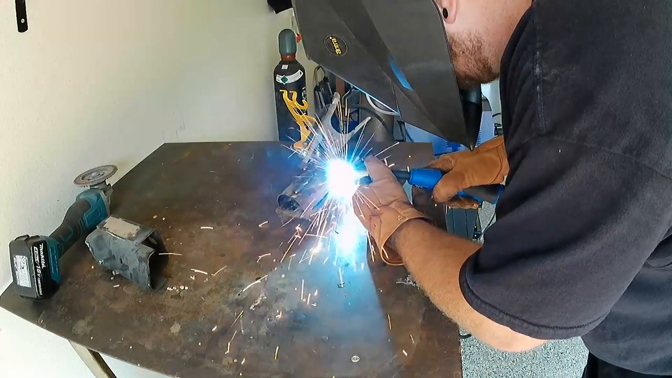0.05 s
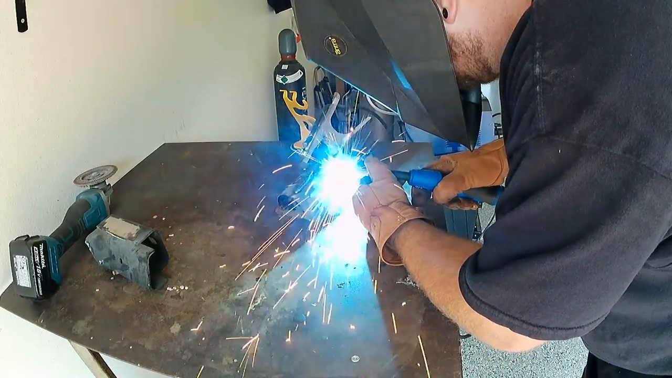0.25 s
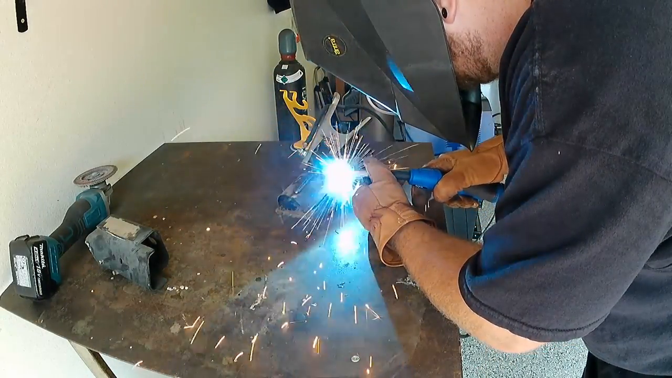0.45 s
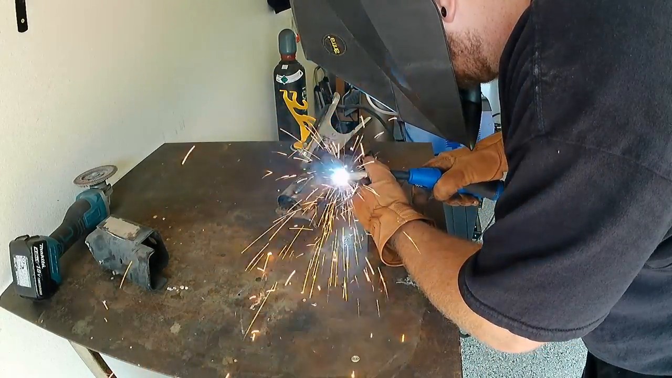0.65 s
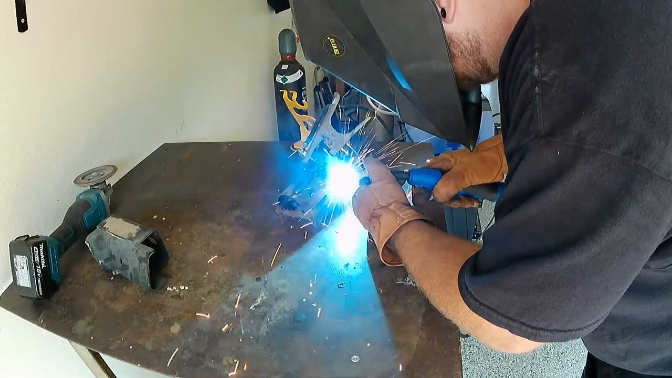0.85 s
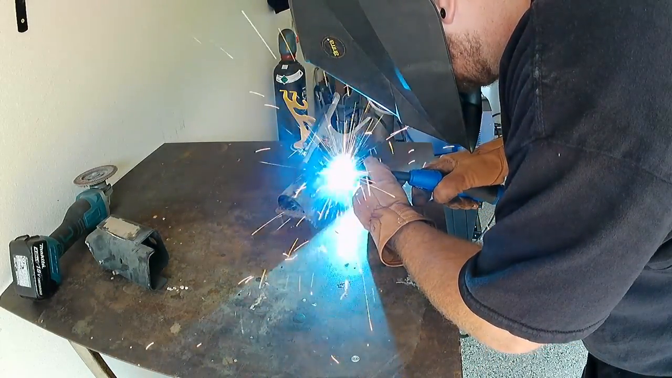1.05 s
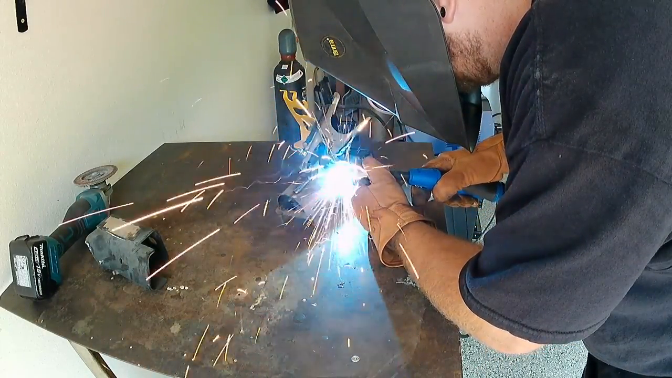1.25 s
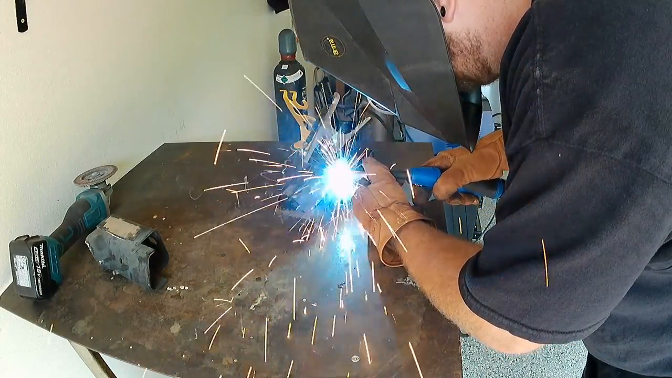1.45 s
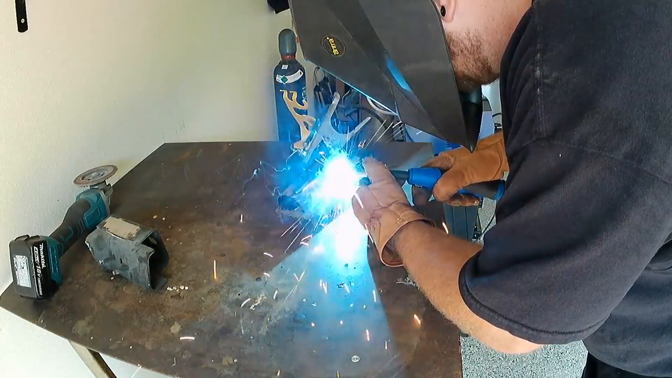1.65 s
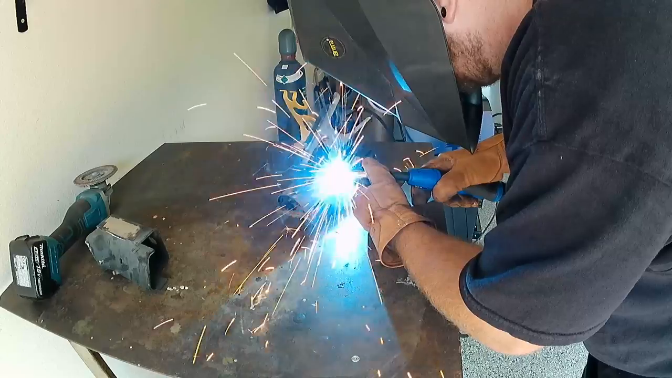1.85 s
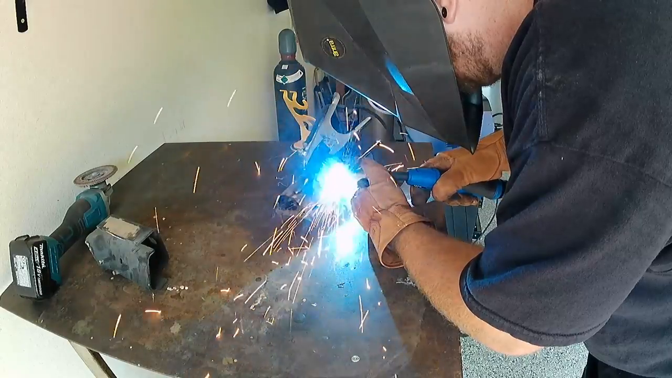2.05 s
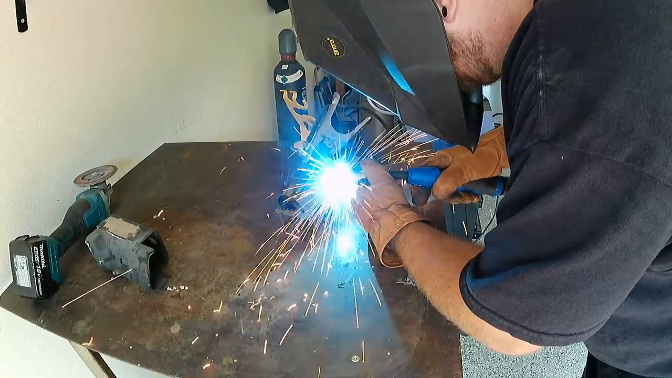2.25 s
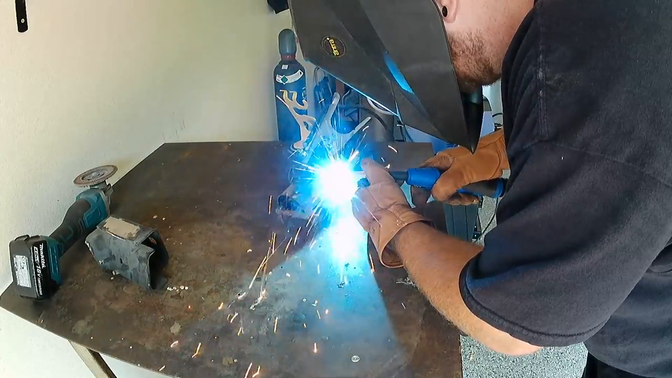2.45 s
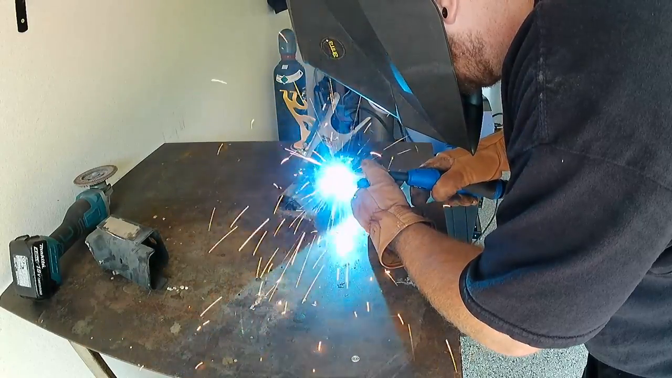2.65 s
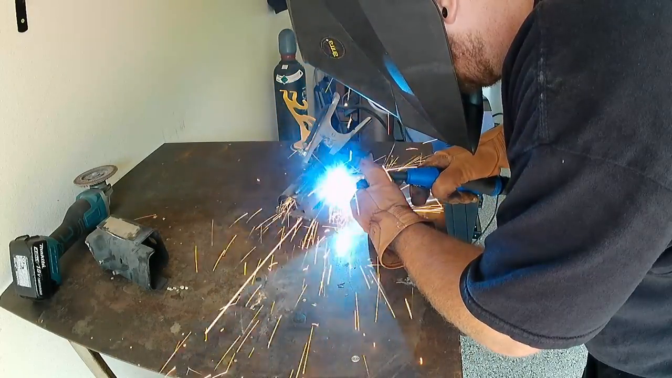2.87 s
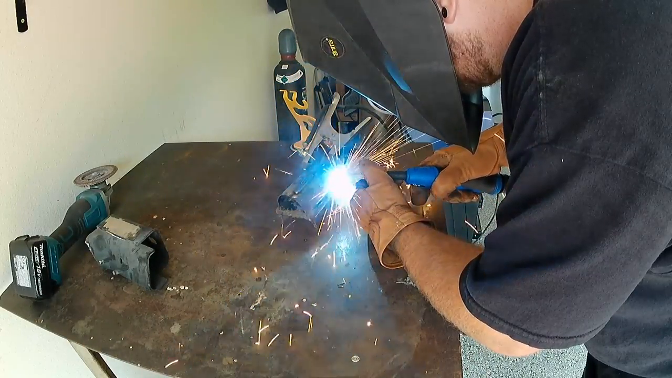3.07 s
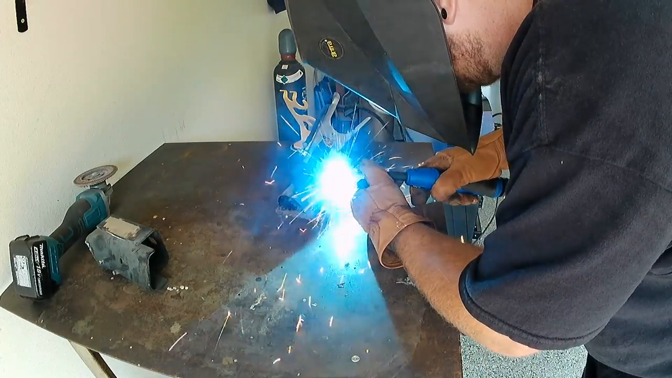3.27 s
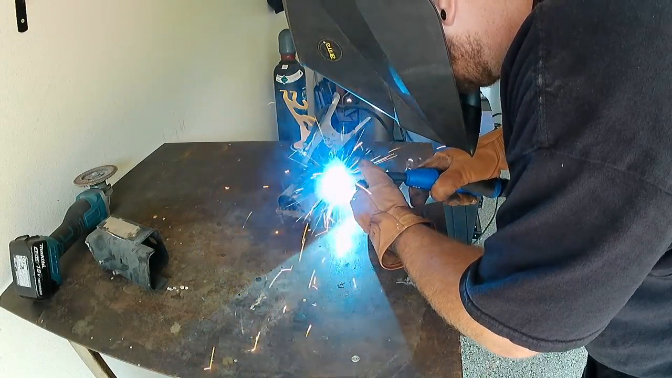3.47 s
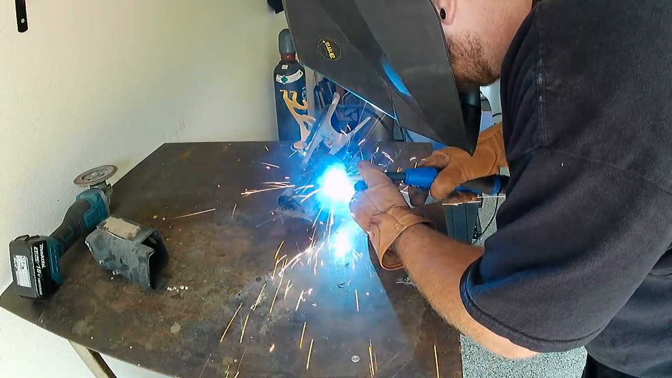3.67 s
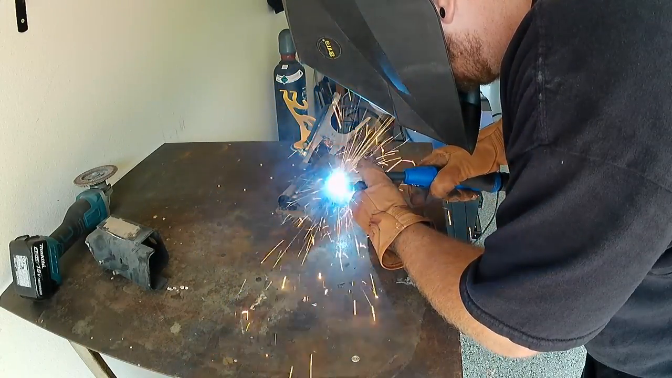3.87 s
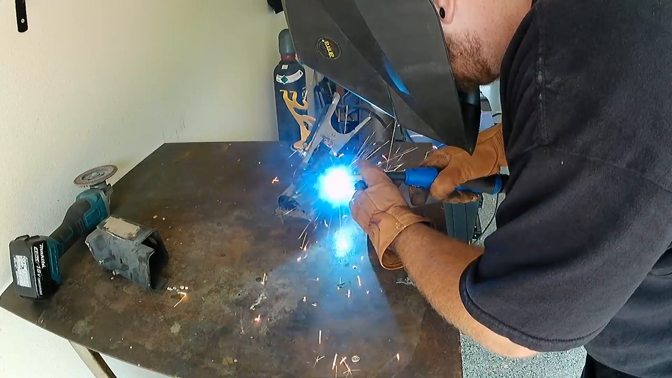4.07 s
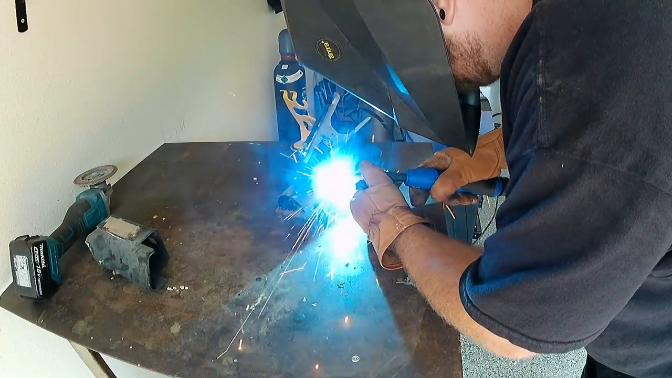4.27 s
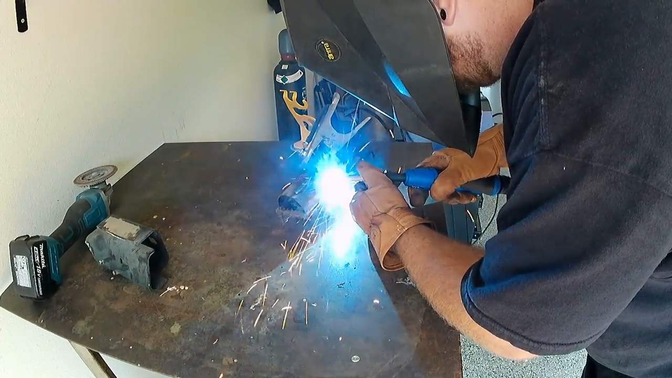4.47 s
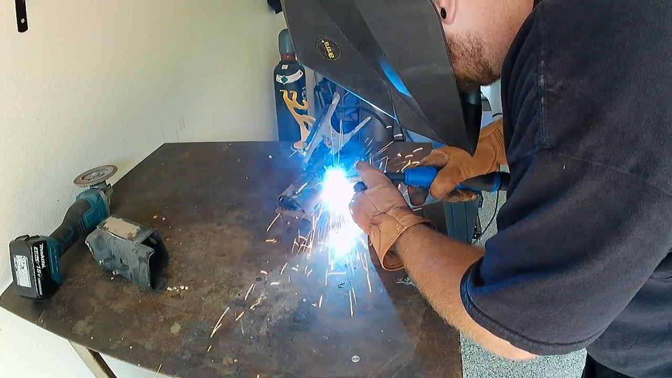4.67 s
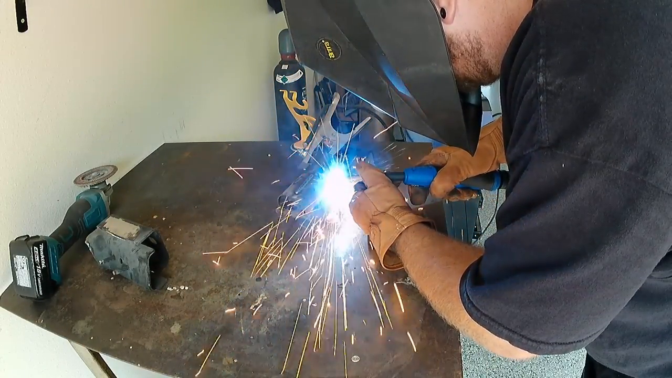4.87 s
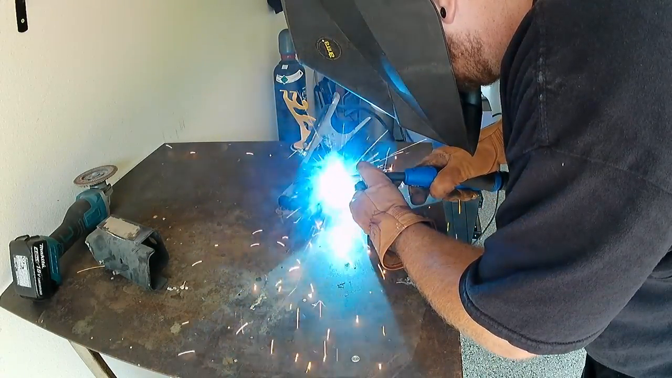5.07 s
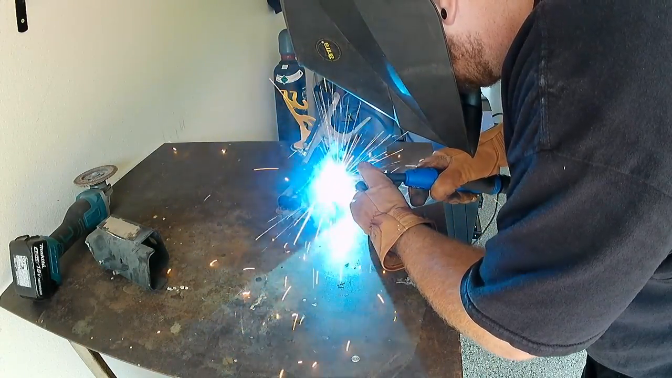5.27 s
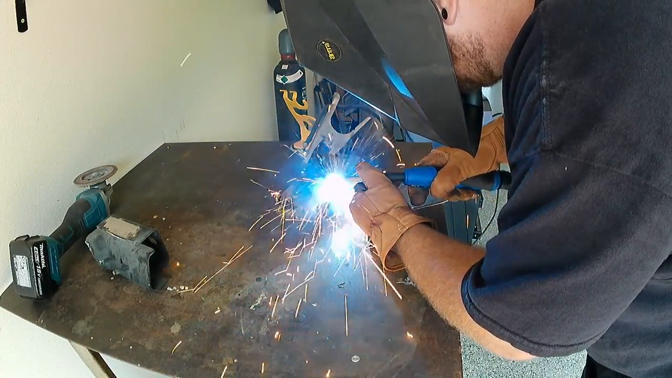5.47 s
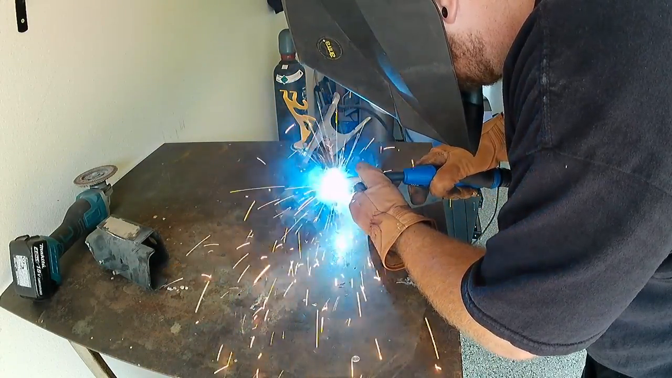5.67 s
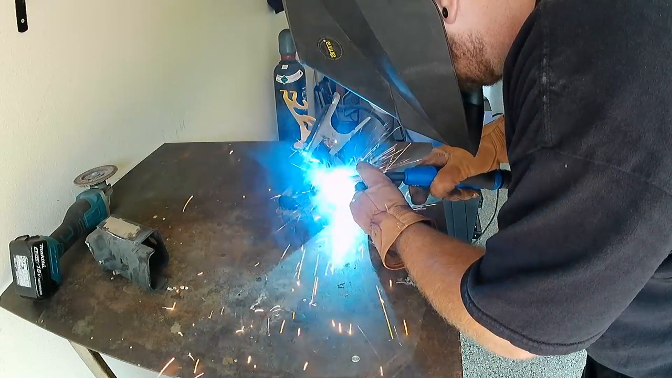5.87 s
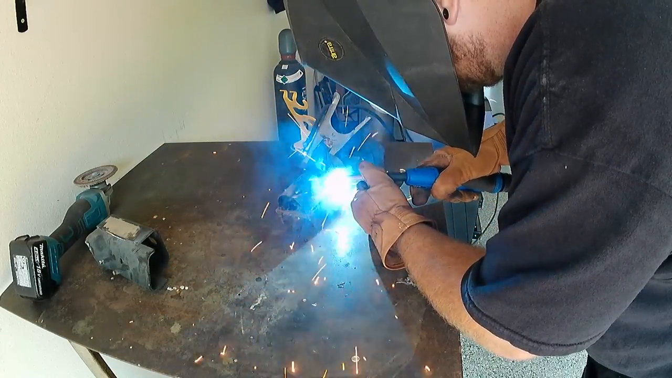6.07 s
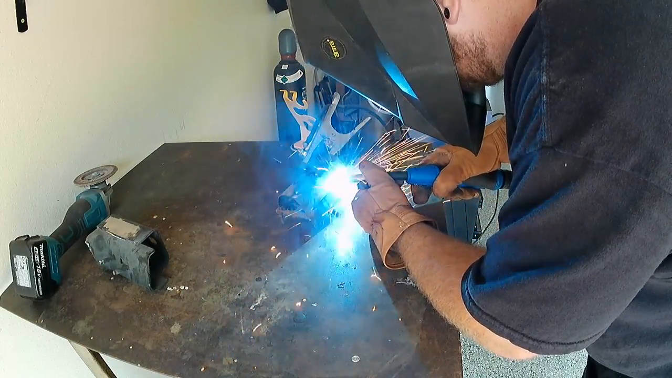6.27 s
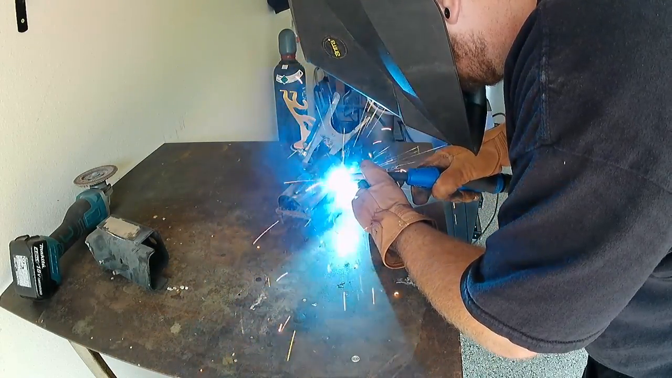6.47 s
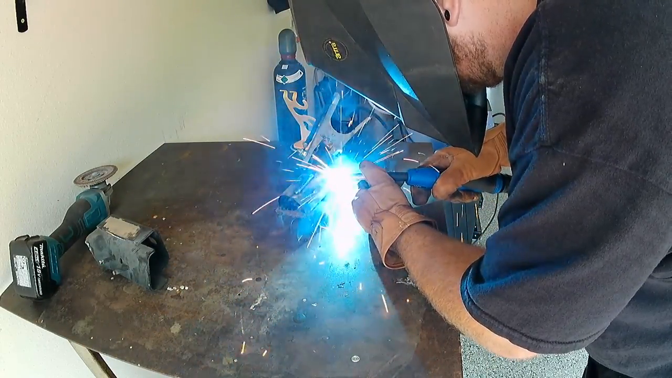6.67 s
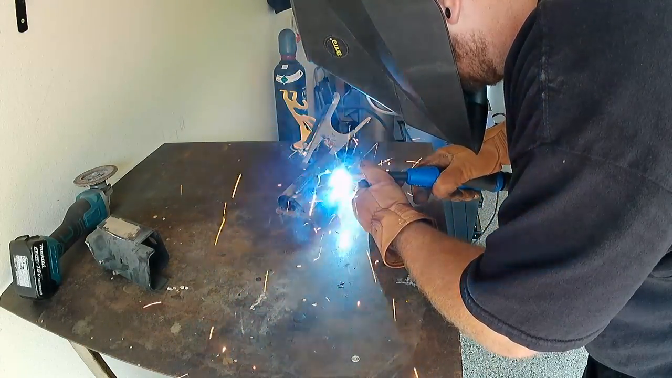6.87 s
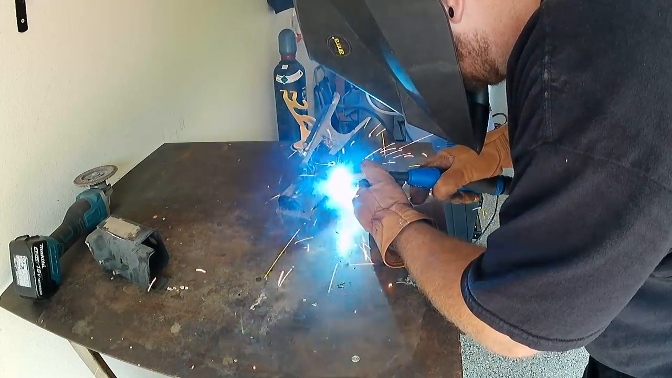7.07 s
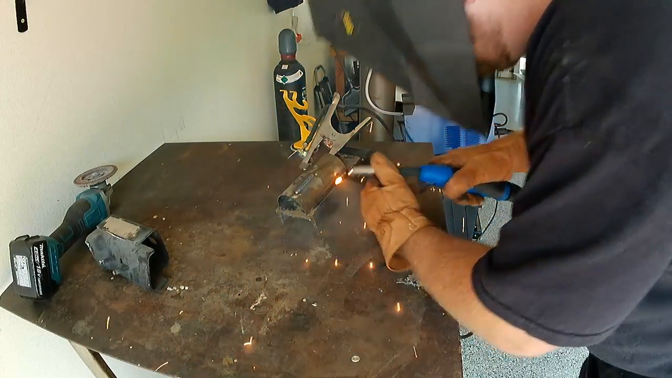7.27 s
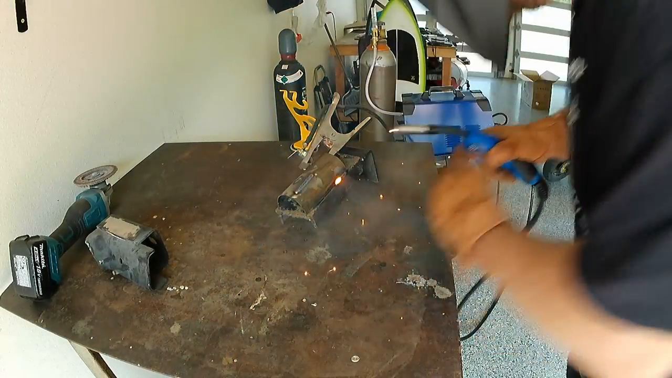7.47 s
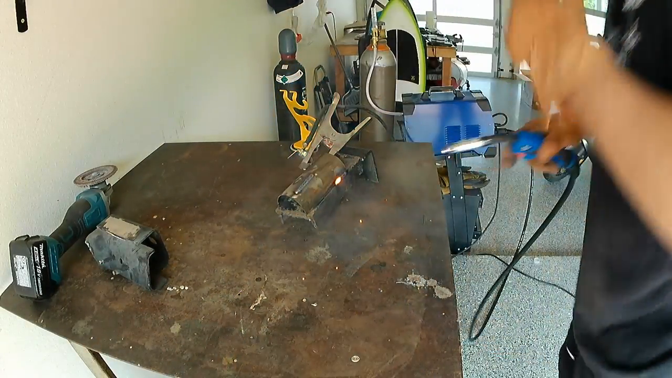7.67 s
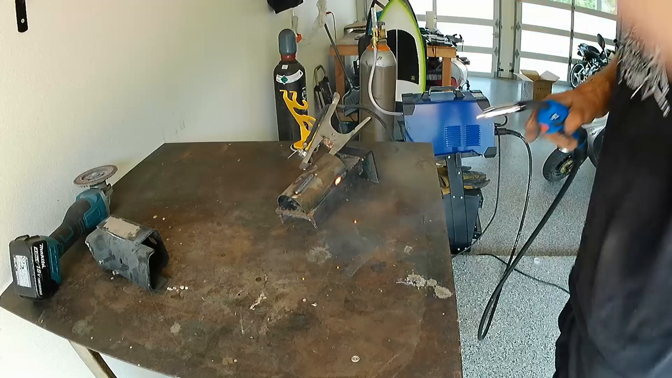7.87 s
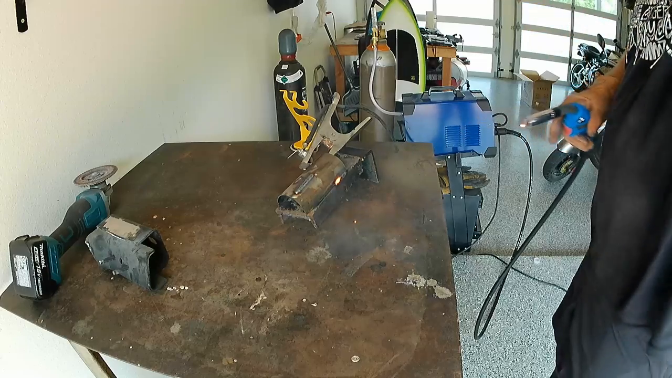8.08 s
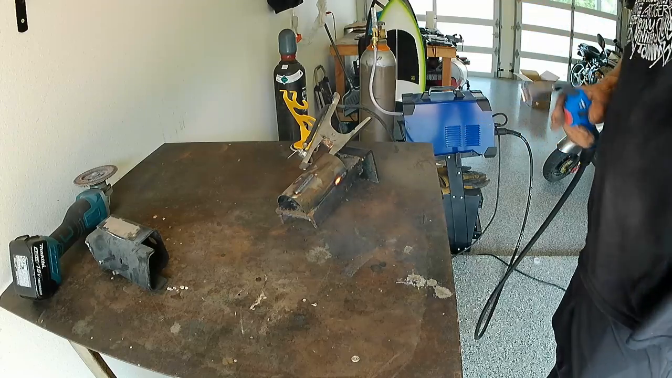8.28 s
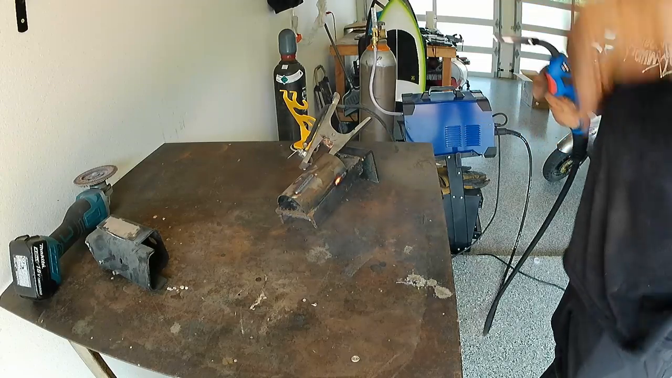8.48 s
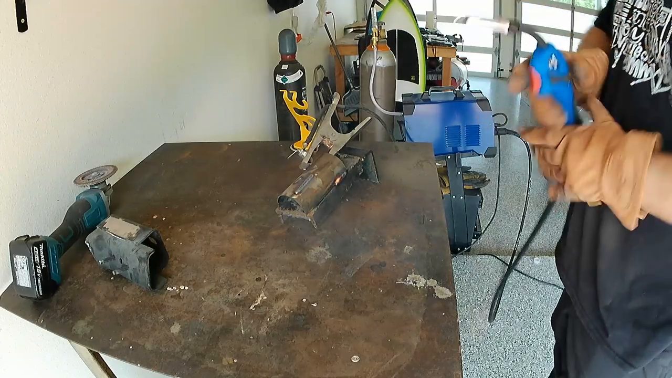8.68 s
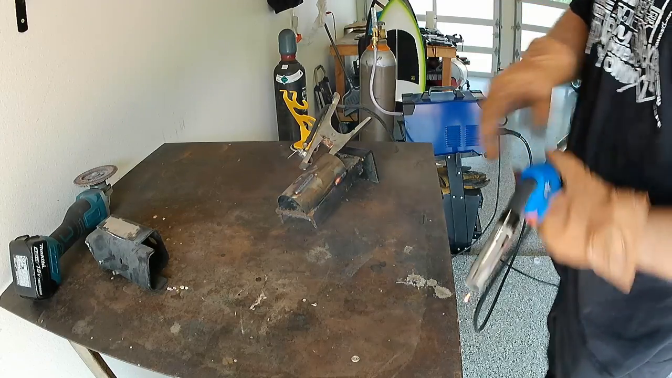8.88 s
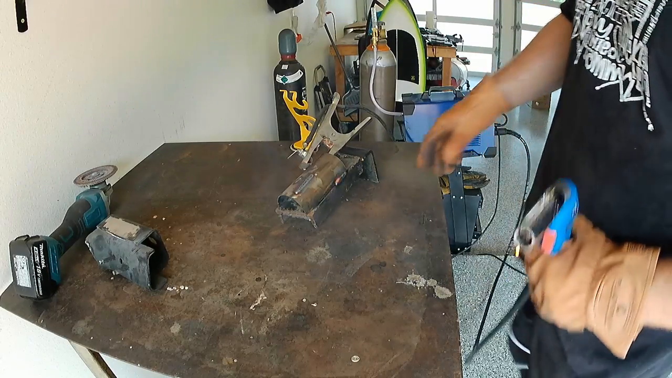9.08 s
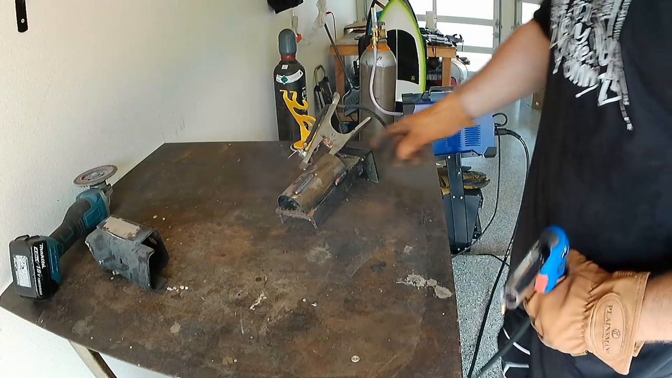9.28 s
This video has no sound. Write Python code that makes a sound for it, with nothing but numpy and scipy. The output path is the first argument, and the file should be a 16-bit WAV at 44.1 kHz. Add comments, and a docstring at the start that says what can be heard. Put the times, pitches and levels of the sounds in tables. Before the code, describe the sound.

A wire welder's arc crackles harshly and unevenly on a steel pipe, then cuts off, leaving a brief gas hiss and low fan hum.

```python
"""Wire welding on a steel pipe

A wire welder works on a short steel pipe lying on a steel bench in a garage, close to a small camera.
Each time the short circuit breaks, the arc restrikes with a pop (suction spike and damped swing) that bounces
off the bench, runs up and down the pipe and rings in the garage. Shielding gas, band-filtered noise, hisses
on after the arc dies; the welder's fan, wavering tones over shaped noise, hums throughout."""
import sys
import numpy as np
from scipy import signal
from scipy.fft import rfft, irfft
from scipy.io import wavfile
from scipy.ndimage import uniform_filter1d

SR = 44100
rng = np.random.default_rng(int(sys.argv[2]) if len(sys.argv) > 2 else 0)


def bounce(signal):
    """Save signal as a 16-bit WAV file at the path given by the first command-line argument."""
    frames = np.transpose(np.atleast_2d(signal))
    limited = np.clip(frames, -1, 1)
    pcm = np.round(limited * 32767).astype(np.int16)
    wavfile.write(sys.argv[1], SR, pcm)


def boost(x):
    """Linear amplitude factor 10**(x/20) for a level x in decibels (scalar or array-like)."""
    u = np.asarray(x, float) / 20
    return 10 ** u


N = 411453


def band(x, centre_hz, width_hz):
    """Two-pole resonance, gain 1 at the centre."""
    b, a = signal.iirpeak(centre_hz, centre_hz / width_hz, fs=SR)
    return signal.lfilter(b, a, x)


def unit(x):
    """Scale to rms 1."""
    return x / np.sqrt(np.mean(x ** 2))


def walk(rate_hz):
    """Random levels held 1 / rate_hz and slewed twice; spread near 1."""
    hold = int(SR / rate_hz)
    held = np.repeat(rng.standard_normal(N // hold + 1), hold)
    slewed = uniform_filter1d(uniform_filter1d(held, hold), hold)
    return 1.3 * slewed[:N]


def train(at_s, gain, size):
    """Clicks at the given times."""
    out = np.zeros(size)
    np.add.at(out, np.round(np.asarray(at_s) * SR).astype(int), gain)
    return out


def gas():
    """Shielding gas: a fluttering hiss, noise through the nozzle's resonances."""
    # gas hissing from the nozzle, before flutter: time_s, level_db
    gas_level = [(0, -24), (.3, -38), (0.448, -37), (7.05, -35.5), (7.2, -47), (7.3, -54), (7.66, -53),
                 (7.69, -67), (9.33, -63)]
    time_s, level_db = np.transpose(gas_level)
    hiss = band(band(rng.standard_normal(N), 5150, 1200), 5270, 1700)
    hiss = hiss + boost(-11.5) * band(rng.standard_normal(N), 9100, 2100)
    hiss = hiss + boost(-23) * band(rng.standard_normal(N), 14500, 5000)
    hiss = hiss + boost(-11.5) * band(rng.standard_normal(N), 2650, 1500)
    flutter_db = 1.5 * walk(15)
    return unit(hiss) * boost(np.interp(np.arange(N) / SR, time_s, level_db) + flutter_db)


def fan():
    """Motor and blade tones, wavering in level and phase, over a wide rush of air."""
    # motor and blade tones, before wavering: pitch_hz, rms_db
    fan_tones = [(30, -39), (90.3, -40.5), (150.7, -39.5), (219, -52), (301.4, -59), (452.2, -56),
                 (527.6, -51), (603, -51), (1055, -58), (1206, -59)]
    # spectrum of air rushing through the fan, overall level set below: freq_hz, relative_density_db
    fan_air = [(12, -30.5), (20, -10.5), (53, -1.5), (154, -9), (262, -13.5), (377, -19.5), (607, -10.5),
               (738, -16), (849, -16), (1710, -19.5), (2670, -31.5), (3200, -31), (3500, -36),
               (4600, -39.5), (5800, -38), (6600, -44.5), (16000, -53)]
    t = np.arange(N) / SR
    tones = 0
    for pitch_hz, rms_db in fan_tones:
        level = np.sqrt(2) * boost(rms_db + 2.47 * walk(7))
        phase = 2 * np.pi * (pitch_hz * t + rng.random()) + 0.4 * walk(5)
        tones = tones + level * np.sin(phase)
    freq_hz, density_db = np.transpose(fan_air)
    bins_hz = np.fft.rfftfreq(N, 1 / SR)
    shape = boost(np.interp(np.log(bins_hz + 1), np.log(freq_hz), density_db))
    air = unit(irfft(rfft(rng.standard_normal(N)) * shape, N))
    air_db = -38 + 0.14 * walk(11)
    return tones + air * boost(air_db)


def restrikes():
    """Times and levels: standout pops and stalls are set, uneven ordinary pops fill the time between them."""
    # arc restrikes that stand out from the drip around them: start_s, level_db
    standout_pops = [(0.1148, 5.3), (0.1684, 5.1), (0.2018, 6.1), (0.2176, 6.7), (0.2517, 5.0),
                     (0.2604, 7.3), (0.7729, 4.0), (0.9138, 4.9), (0.9305, 6.2), (0.938, 5.3),
                     (0.9463, 5.1), (0.9853, 6.6), (1.0094, 5.0), (1.0425, 5.6), (1.0602, 6.5),
                     (1.0924, 6.2), (1.1103, 6.5), (1.1193, 6.7), (1.1289, 7.6), (1.1722, 6.4),
                     (1.1906, 7.1), (1.3005, 5.0), (1.4114, 3.0), (1.5947, 4.9), (1.7018, 5.5),
                     (1.7409, 7.5), (1.7501, 6.2), (1.7877, 8.2), (1.8063, 5.9), (1.8247, 6.2),
                     (1.9436, 7.1), (1.955, 5.0), (1.978, 7.2), (2.0331, 7.2), (2.1196, 6.1), (2.164, 4.3),
                     (2.4933, 6.4), (2.5382, 5.1), (2.5909, 5.6), (2.7813, 2.7), (2.8369, 7.0),
                     (2.8591, 5.8), (2.9057, 5.6), (2.9277, 4.9), (2.9671, 3.3), (2.9774, 4.6),
                     (3.2301, 4.4), (3.2776, 5.8), (3.3004, 3.7), (3.3234, 5.1), (3.5033, 4.6),
                     (3.557, 5.3), (3.6246, 6.7), (3.6805, 6.5), (3.7331, 5.2), (3.7494, 5.0),
                     (3.7745, 3.2), (3.9054, 3.7), (4.1731, 3.4), (4.1948, 4.8), (4.209, 3.3), (4.279, 3.6),
                     (4.5095, 2.7), (4.7358, 6.7), (4.7474, 4.7), (4.7693, 6.0), (4.7807, 6.1),
                     (4.7952, 7.0), (5.1217, 4.3), (5.1566, 5.2), (5.2123, 4.7), (5.2975, 5.2),
                     (5.4512, 4.7), (5.4646, 5.2), (5.4832, 6.0), (5.5603, 6.2), (5.8137, 3.2),
                     (5.872, 6.5), (5.9561, 3.5), (5.9836, 5.5), (6.0134, 7.7), (6.0456, 5.8),
                     (6.1676, 4.3), (6.2002, 5.2), (6.2282, 5.6), (6.2444, 6.2), (6.531, 4.6), (6.579, 4.5),
                     (6.5853, 3.4), (6.6591, 3.5), (6.6672, 5.1), (6.8216, 3.9), (7.0438, 3.4)]
    # stalls, where the wire sticks or the drop hangs on: last_pop_before_s, first_pop_after_s
    stalls = [(0.2604, 0.4563), (0.4563, 0.4764), (0.6298, 0.6585), (0.6585, 0.6768), (0.6954, 0.7146),
              (0.7295, 0.7538), (0.7538, 0.7729), (0.7729, 0.7904), (0.8719, 0.8904), (0.9543, 0.9853),
              (1.1289, 1.1722), (1.6795, 1.7018), (1.7119, 1.7409), (1.7501, 1.7877), (1.9154, 1.9436),
              (2.0137, 2.0331), (2.1012, 2.1196), (2.1394, 2.164), (2.4318, 2.4585), (2.469, 2.4933),
              (2.5024, 2.5287), (2.5382, 2.5721), (2.8179, 2.8369), (2.8591, 2.881), (3.2301, 3.2512),
              (3.3004, 3.3234), (3.3234, 3.348), (3.4559, 3.4794), (3.4794, 3.5033), (3.6044, 3.6246),
              (3.6348, 3.6574), (3.6805, 3.7088), (3.8434, 3.8616), (4.209, 4.2293), (4.303, 4.3265),
              (4.4275, 4.4543), (4.4543, 4.4763), (4.6807, 4.7016), (4.7155, 4.7358), (4.7474, 4.7693),
              (4.8236, 4.8436), (5.1566, 5.1843), (5.1843, 5.2123), (5.2123, 5.2638), (5.2782, 5.2975),
              (5.3163, 5.3393), (5.3582, 5.3852), (5.5093, 5.5442), (5.7569, 5.774), (5.9302, 5.9561),
              (5.9561, 5.9836), (5.9836, 6.0134), (6.0134, 6.0456), (6.0456, 6.1188), (6.1188, 6.1398),
              (6.1398, 6.1676), (6.369, 6.3924), (6.4347, 6.4587), (6.5111, 6.531), (6.5491, 6.579),
              (6.6368, 6.6591), (6.6672, 6.6989), (6.8506, 6.9145), (6.9145, 6.939), (6.9945, 7.0209),
              (7.0209, 7.0438)]
    # ordinary drip of short circuits as the torch weaves: time_s, restrikes_per_s, level_db
    drip = [(0.0, 120, -2.8), (0.25, 75.5, 2.5), (0.601, 118, -2.6), (0.699, 113, -3.5), (0.95, 98, 4.9),
            (1.199, 63.5, 2.5), (1.5, 93, -2.1), (1.7, 58.7, 3.4), (1.9, 54, 2), (1.97, 86, 0),
            (2.15, 50.5, 1), (2.25, 102, -4.5), (2.5, 77, 2.5), (2.65, 51, 1.5), (2.8, 70.6, -1),
            (3.06, 90, -2.5), (3.12, 140, -3), (3.2, 84, -0.5), (3.45, 66, 1.5), (3.72, 75, 0.5),
            (3.83, 163, -2.5), (3.93, 149, -4), (4.02, 82, -2.5), (4.4, 67, 0.5), (4.95, 95, -0.2),
            (5.3, 68.7, 2.0), (5.5, 79.6, 2), (5.57, 133, 2), (5.63, 95, 0), (5.8, 87.5, 0.3),
            (5.9, 72, 0.9), (6.0, 87, 0), (6.2, 112, 0.5), (6.35, 61.6, -1.7), (6.7, 74, 0.6),
            (7.07, 58, -0.3)]
    first_pop_s, arc_off_s = .0077, 7.063
    gap_spread, level_spread_db = .14, 1.3  # from one ordinary restrike to the next

    t = np.arange(N) / SR
    drip_s, rate_hz, drip_db = np.transpose(drip)
    cycles = np.cumsum(np.interp(t, drip_s, rate_hz)) / SR
    standout_s, standout_db = np.transpose(standout_pops)
    stall_starts_s = np.transpose(stalls)[0]
    marks_s = np.unique(np.r_[first_pop_s, standout_s, np.ravel(stalls), arc_off_s])
    pops_s = [marks_s]
    for start_s, end_s in zip(marks_s[:-1], marks_s[1:]):
        gaps = np.exp(gap_spread * rng.standard_normal(64))
        if start_s in stall_starts_s:
            continue
        first, last = np.interp([start_s, end_s], t, cycles)
        steps = np.cumsum(gaps[:max(round(last - first), 1)])
        # scaled so the final gap ends on the next mark
        pop_cycles = first + (last - first) * steps[:-1] / steps[-1]
        pops_s.append(np.interp(pop_cycles, cycles, t))
    pops_s = np.sort(np.concatenate(pops_s))

    spread_db = level_spread_db * rng.standard_normal(2048)[:len(pops_s)]
    level_db = np.interp(pops_s, drip_s, drip_db) + spread_db
    level_db = np.minimum(level_db, np.median(standout_db))
    level_db[np.searchsorted(pops_s, standout_s)] = standout_db
    return pops_s, level_db


def crack(spike_s, rebound_hz, rebound_s):
    """One restrike over its near paths: a narrow suction spike and the slower damped swing back."""
    # paths to the microphone, direct and by way of bench and work: delay_ms, gain
    near_paths = [(0.0, .65), (0.192, 1.1), (0.38, .56)]
    delay_ms, gain = np.transpose(near_paths)
    t = np.arange(-4, 300)[:, None] / SR - delay_ms / 1000
    spike = -np.exp(-.5 * (t / spike_s) ** 2)
    decay = (t > 0) * np.exp(-np.abs(t) / rebound_s)
    swing = decay * np.sin(2 * np.pi * rebound_hz * t)
    return spike @ gain, swing @ gain


def pipe():
    """Response of pipe and bench to one click: returns flipped at each open end, and short rings."""
    # returns along the pipe: delay_ms, level_db
    pipe_returns = [(1.11, -16), (2.314, -14), (3.38, -16), (4.717, -16), (5.728, -20)]
    # what pipe and bench ring with: centre_hz, width_hz, level_db
    rings = [(426, 50, 9), (653, 60, 10), (822, 86, 6), (1180, 150, 3.5), (1302, 75, 10.8), (1671, 66, 9.5),
             (2500, 120, 5), (2910, 160, 4), (10300, 500, -2), (11800, 450, 2)]
    click = train([0], 1.0, size=4096)
    delay_ms, level_db = np.transpose(pipe_returns)
    flips = (-1) ** np.arange(1, len(delay_ms) + 1)
    returns = train(delay_ms / 1000, boost(level_db) * flips, size=4096)
    ringing = sum(boost(db) * band(click, centre_hz, width_hz) for centre_hz, width_hz, db in rings)
    return click + returns + ringing


def garage(clutter_t60_s):
    """Diffuse answer to one pop, decaying noise bands: quick scatter from things nearby, then the walls."""
    # short waves scattered by clutter on the bench: centre_hz, initial_db
    clutter_bands = [(2500, -34), (3950, -28.5), (5400, -20), (7200, -26.5), (10300, -32), (12000, -52),
                     (14800, -27)]
    # garage tail by band: centre_hz, initial_db, t60_s
    wall_bands = [(292, -48.5, 0.54), (500, -46, 0.69), (661, -42, 0.48), (890, -38.5, 0.34),
                  (1323, -39, 0.62), (1694, -34, 0.21), (2900, -44.5, 0.43), (4110, -43.5, 0.5),
                  (5500, -37, 0.29), (6840, -47.5, 0.4), (9950, -38.5, 0.25), (12000, -51, 0.25),
                  (15000, -47.5, .3), (1516, -41, .3)]
    t = np.arange(SR // 2) / SR

    def noise(centre_hz):
        """Unit-rms noise through two resonances at one centre."""
        narrow = band(rng.standard_normal(len(t)), centre_hz, .22 * centre_hz)
        return unit(band(narrow, centre_hz, .3 * centre_hz))

    clutter = sum(boost(db - 60 * t / clutter_t60_s) * noise(hz) for hz, db in clutter_bands)
    walls = sum(boost(db - 60 * t / t60_s) * noise(hz) for hz, db, t60_s in wall_bands)
    clutter_onset = 1 - np.exp(-(t / .001) ** 2)
    walls_onset = 1 - np.exp(-(t / .006) ** 2)
    return clutter_onset * clutter + walls_onset * walls


def arc():
    """Restrike pops through pipe and garage; each spike is a little sharper or softer than its swing."""
    # make-up of the restrikes as the torch travels along the seam: time_s, spike_db, swing_db
    snap = [(0, 1, 1), (.8, 2, -1), (2.2, 2, 0.5), (3.2, 0.5, 0), (4.2, 1, 0.5), (4.8, 0.5, 0.5),
            (5.7, -1, 1), (6.2, 1, 1), (6.8, 3, 0), (7.1, 0, 0.5)]
    pops_s, level_db = restrikes()
    chance = rng.standard_normal((2048, 3))[:len(pops_s)].T
    pops_s = pops_s + 4e-5 * chance[0]  # small random shift of each restrike's start
    snap_s, spike_db, swing_db = np.transpose(snap)
    snap_db = np.interp(pops_s, snap_s, spike_db) + 2.0 * chance[1]
    rebound_db = np.interp(pops_s, snap_s, swing_db)

    spike, swing = crack(spike_s=1.65e-5, rebound_hz=1370, rebound_s=1.9e-4)
    spikes = signal.fftconvolve(train(pops_s, boost(level_db + snap_db), N), spike)
    swings = 0.6 * signal.fftconvolve(train(pops_s, boost(level_db + rebound_db), N), swing)

    # as the torch travels, the scattered paths slowly change from one pattern to another
    turn_rad = 2 * np.pi * pops_s / 5.0 + .5 * chance[2]
    diffuse = 0
    for share in (np.cos(turn_rad), np.sin(turn_rad)):
        pops = train(pops_s, share * boost(level_db + snap_db / 2), N)
        diffuse = diffuse + signal.fftconvolve(pops, garage(clutter_t60_s=0.037))
    return signal.fftconvolve(spikes + swings, pipe())[:N] + diffuse[:N]


def scene():
    """Arc, gas and fan at one microphone."""
    mix = arc() + gas() + fan()
    return mix[None]


def band_limit(x):
    """A steep low-pass at the top of the band."""
    return signal.sosfilt(signal.butter(12, 16770, fs=SR, output="sos"), x)


def record(dry):
    """The camera sits on a small offset, overloads on the loudest peaks and cuts the top."""
    top_hz = 15700
    loaded = np.clip(dry + .0168, -1.06, 1.06)
    top_cut = signal.ellip(10, .2, 70, top_hz, fs=SR, output="sos")
    return band_limit(signal.sosfilt(top_cut, loaded))


dry = scene()
out = record(dry)
bounce(out)
```